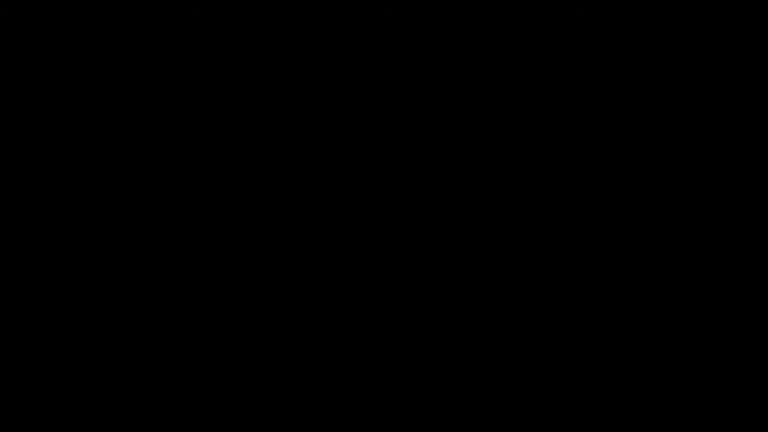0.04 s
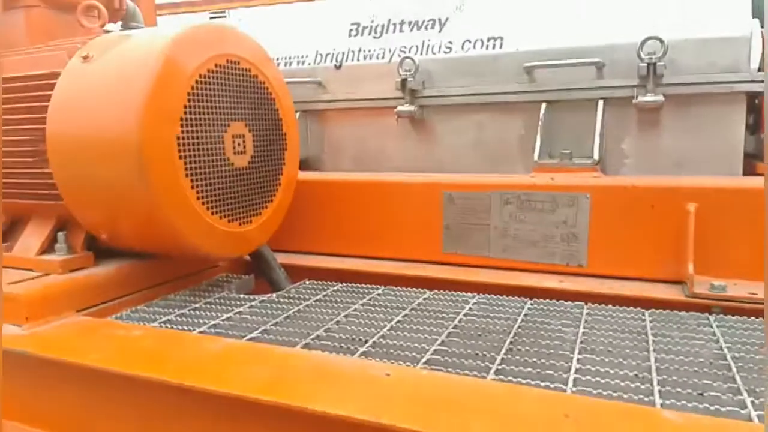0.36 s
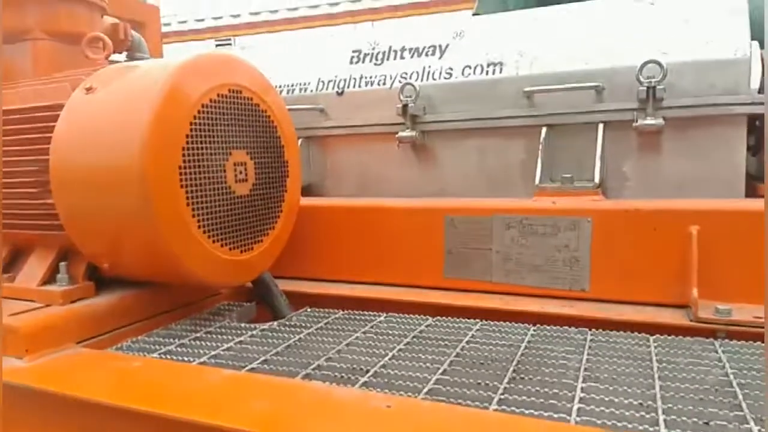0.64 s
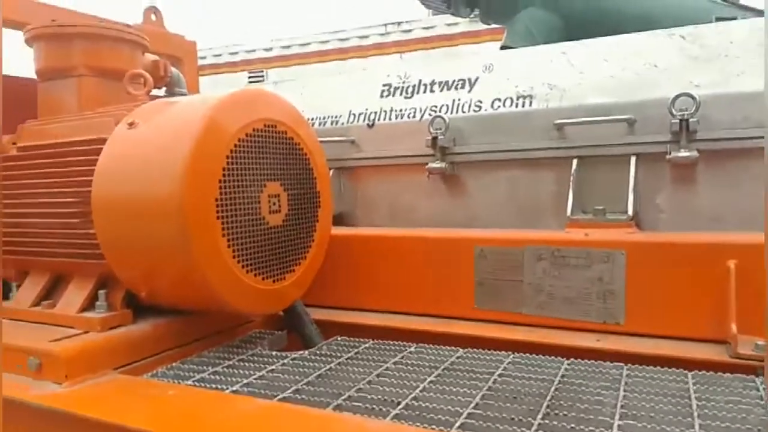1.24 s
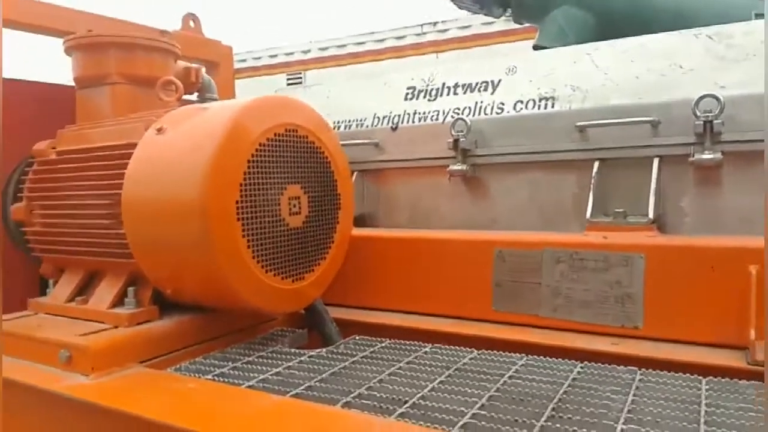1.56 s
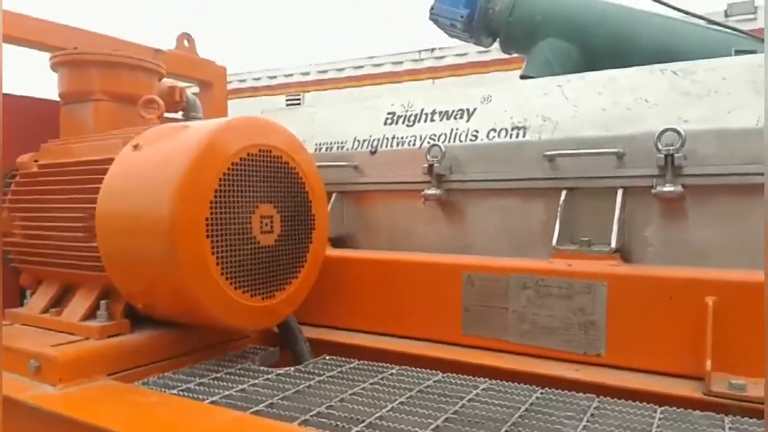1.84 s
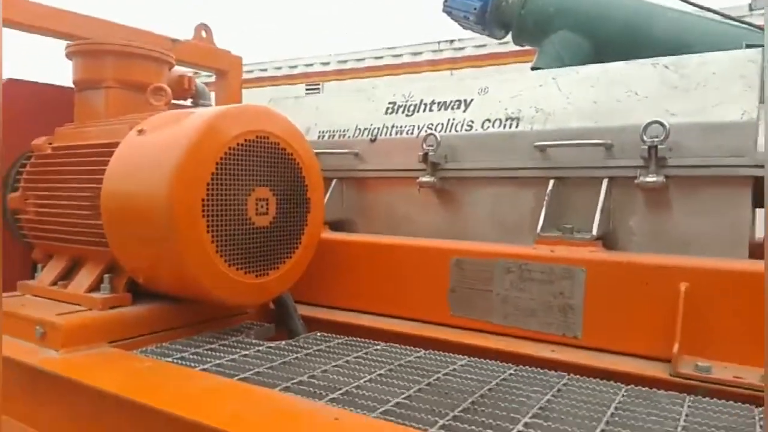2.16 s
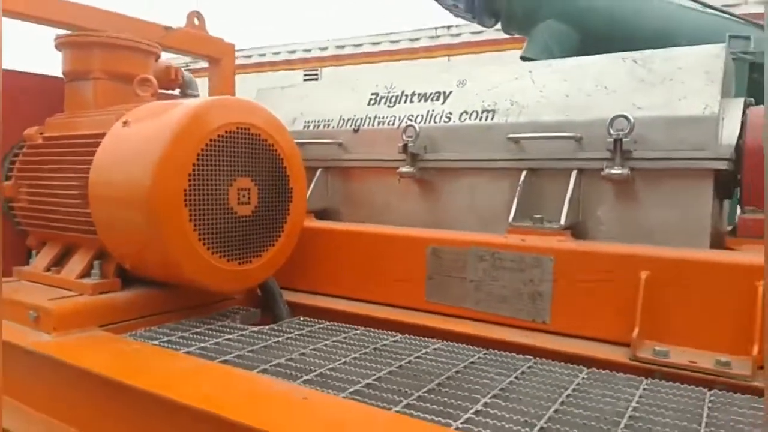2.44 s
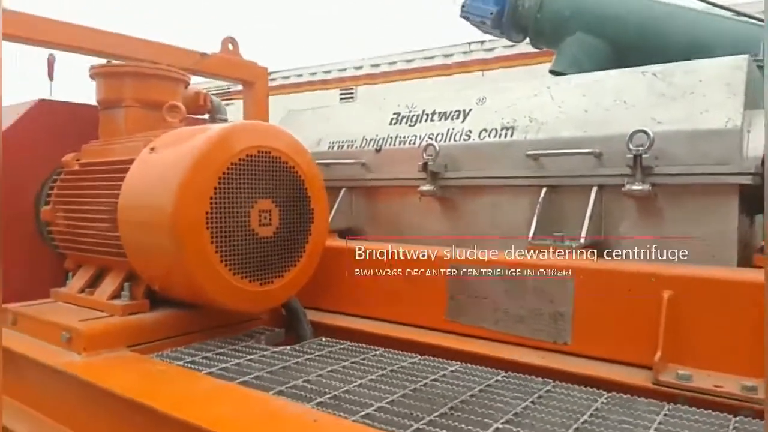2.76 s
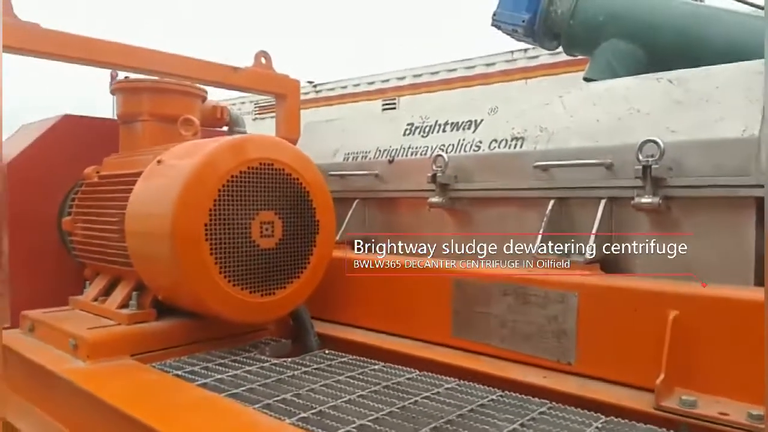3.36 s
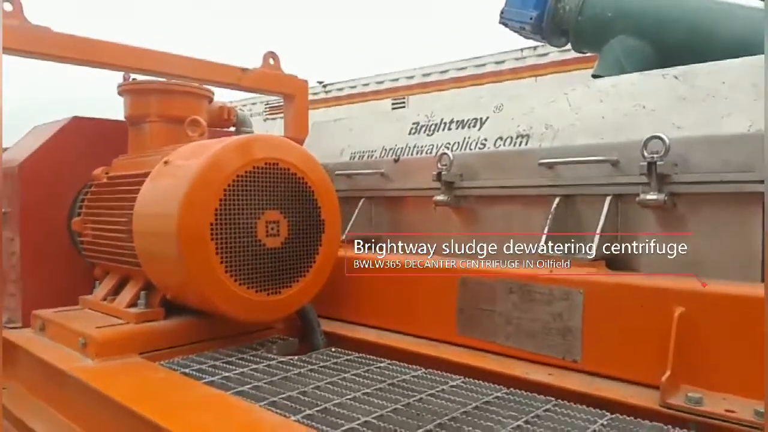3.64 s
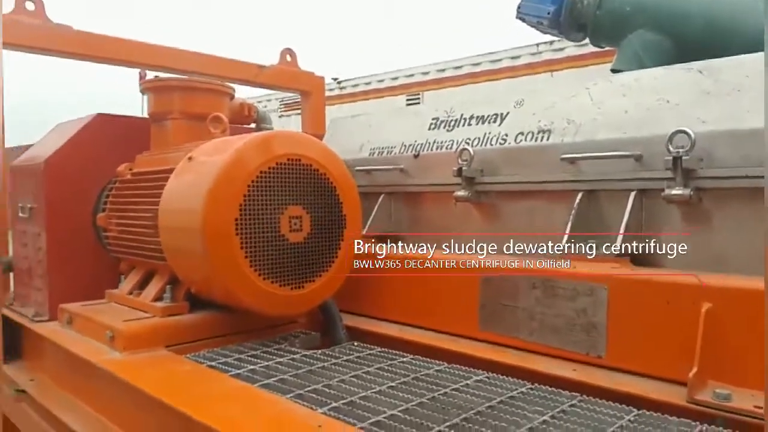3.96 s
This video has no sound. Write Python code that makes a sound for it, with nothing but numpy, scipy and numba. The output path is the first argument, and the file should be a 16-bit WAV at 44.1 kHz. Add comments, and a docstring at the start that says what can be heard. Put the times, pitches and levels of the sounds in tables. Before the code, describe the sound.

A large centrifuge is heard close up, already at full speed from about 0.1 seconds. Its low hum and the electric motor's steady tones sit within a constant roar and hiss, while a higher whine wavers in loudness. At about 1.3 seconds a low thump hits the microphone, briefly dipping the noise, with a much fainter one at 1.4. The machine runs on until the end, around 4 seconds.

```python
"""A decanter centrifuge runs at full speed, heard a step away: its unbalanced bowl makes the frame hum.
The drive's whine, modulated by each turn, carries sidebands spaced at the bowl rate.
Behind them the electric motor adds steady tones, and turbulent air and sludge roar and hiss.
Two low thumps of pressure strike the hand-held microphone; the first briefly pushes its limiter down."""
import sys
import numpy as np
from scipy import signal
from scipy.fft import rfft, irfft
from scipy.io import wavfile
from scipy.ndimage import uniform_filter1d
from numba import njit

SR = 44100
rng = np.random.default_rng(int(sys.argv[2]) if len(sys.argv) > 2 else 0)


def generate_wav(signal):
    """Clip the signal to [-1, 1] and save it as 16-bit WAV at the path in sys.argv[1]."""
    frames = np.transpose(np.atleast_2d(signal))
    scaled = np.clip(frames, -1, 1) * 32767
    pcm = np.round(scaled).astype(np.int16)
    wavfile.write(sys.argv[1], SR, pcm)


N = 176400

BOWL_HZ, WHINE_HZ, TOP_HZ = 47.22, 1011.0, 7500


def undb(db):
    return 10 ** (np.asarray(db) / 20)


def times():
    return np.arange(N) / SR


def curve(rows, column=1):
    """Linear interpolation of one table column over time."""
    rows = np.array(rows, float)
    return np.interp(times(), rows[:, 0], rows[:, column])


def walk(rate_hz):
    """Low-pass noise of unit variance: random steps, smoothed twice."""
    hold = int(SR / rate_hz)
    steps = np.repeat(rng.standard_normal(N // hold + 2), hold)[rng.integers(hold):]
    smooth = uniform_filter1d(uniform_filter1d(steps, hold), hold)[:N]
    return (smooth - smooth.mean()) / smooth.std()


def tone(cycles, rms_db, waver, rate_hz):
    """Interference with reflections, taken as a random phasor, varies a partial's amplitude and phase."""
    path = (1 + waver * (walk(rate_hz) + 1j * walk(rate_hz))) / np.sqrt(1 + 2 * waver ** 2)
    phasor = np.exp(2j * np.pi * (cycles + rng.random()))
    return np.sqrt(2) * undb(rms_db) * np.real(path * phasor)


def microphone_thumps():
    """Pressure transients from a puff of air or the hand: each a slow push with a shallow rebound."""
    # pushes on the microphone: start_s, level_db
    pushes = [(1.259, 7), (1.391, -8)]
    rise_s, decay_s, rebound_s = .018, .02, .065
    out = 0
    for start_s, level_db in pushes:
        age = np.maximum(times() - start_s, 0)
        push = (1 - np.exp(-age / rise_s)) * np.exp(-age / decay_s)
        rebound = age ** 2 * np.exp(-2 * age / rebound_s)
        out = out + undb(level_db) * (push / push.max() - .12 * rebound / rebound.max())
    return out


def turbulent_roar(turns):
    """Turbulence in air and sludge radiates broadband noise, coloured by resonances of the housing."""
    # spectral envelope of the turbulence: frequency_hz, relative_density_db
    envelope = [(20, -10), (60, -5), (110, -4), (160, -4.5), (200, -0.5), (270, -2), (360, -6.5),
                (520, -6.5), (620, -9), (790, -7.5), (950, -10), (1180, -12), (1370, -15.5), (1750, -17),
                (2400, -23), (3000, -23.5), (4000, -23), (5900, -23.5), (7200, -27.5), (7600, -39.5)]
    # peaks and a dip in the steel housing's response: centre_hz, width_hz, gain_db
    housing = [(3410, 79, 2), (3500, 160, 3), (3940, 60, -1), (5230, 260, 4), (5450, 60, 3)]
    # gains of the low roar, middle roar and hiss: time_s, low_db, middle_db, hiss_db
    range_gains = [(.15, -3.5, -0.5, 0.5), (.45, 1, 0.5, 0.5), (.8, -1, -1, -1), (1.22, -2, -0.5, -0.9),
                   (1.42, -1.5, -1.5, -1.5), (1.55, 1.5, 0.5, .8), (1.8, 2, 1, 0), (2.1, -.5, 0, .5),
                   (2.38, 0, 1.1, 1.8), (2.55, 0, -0.2, 0.2), (3.1, -0.5, .5, -0.1), (3.55, .5, .5, 0.5),
                   (4.0, -2, 1, 1)]
    low_below_hz, hiss_above_hz = 400, 2200
    base_db, swell_db, flicker_db = -17.5, .33, .71
    hz = np.maximum(np.arange(N // 2 + 1) * SR / N, 1)
    envelope_hz, density_db = np.array(envelope, float).T
    housing_db = sum(db / (1 + (2 * (hz - centre) / width) ** 2) for centre, width, db in housing)
    gain = undb(np.interp(np.log(hz), np.log(envelope_hz), density_db) + housing_db)
    gain *= (hz > 16) & (hz < TOP_HZ + 500)
    spectrum = rfft(rng.standard_normal(N)) * gain / np.sqrt(np.mean(gain ** 2))
    third_octave = np.floor(3 * np.log2(hz))
    out = 0
    for band in np.unique(third_octave[gain > 0]):  # each band flickers alone; all swell together
        inside = third_octave == band
        centre_hz = hz[inside].mean()
        column = 1 + int(centre_hz > low_below_hz) + int(centre_hz > hiss_above_hz)
        band_db = curve(range_gains, column) + flicker_db * walk(22.12)
        out = out + irfft(spectrum * inside, N) * undb(band_db)
    turn_pulse = 1 + .041 * np.cos(2 * np.pi * turns)
    return out * undb(base_db + swell_db * walk(24)) * turn_pulse


def motor_tones():
    """Superposition: tones of motor, belt and mains beat against nearby harmonics of the bowl."""
    # steady partials: pitch_hz, level_db
    partials = [(24.8, -32), (118.8, -22.5), (181.3, -30), (270, -35.5), (296, -36.5), (300, -32),
                (784, -41)]
    return sum(tone(hz * times(), db, waver=.26, rate_hz=3.04) for hz, db in partials)


def drive_whine(turns):
    """Modulation by each turn of the bowl splits the drive's whine into a carrier and sidebands."""
    # strong partials, whose levels shift as the microphone moves: time_s, level_db
    carrier_levels = [(.15, -34), (.55, -32.5), (.95, -26), (1.22, -22), (1.55, -33.5), (2.1, -25.5),
                      (2.3, -46), (2.55, -30), (3.4, -26.5), (4.0, -36)]
    upper_levels = [(.25, -25.5), (.5, -29), (.76, -25.5), (1.0, -44), (1.55, -36), (2.3, -38.5),
                    (2.48, -24.5), (2.7, -41.5), (2.88, -23.5), (3.3, -27.5), (3.6, -39.5), (4.0, -34)]
    lower_levels = [(.15, -45), (1.7, -43), (2.05, -32), (2.45, -31), (2.8, -32.5), (3.15, -27.5),
                    (3.6, -24), (4.0, -29)]
    # weak sidebands: offset_in_bowl_rates, relative_level_db
    sidebands = [(-4, -41), (-1, -35), (2, -36), (3, -44), (4, -38), (5, -41), (6, -46), (8, -46), (9, -48),
                 (10, -48), (11, -46), (12, -49), (14, -47)]
    carrier = turns * WHINE_HZ / BOWL_HZ
    lower_db = curve(lower_levels)
    partials = [(-3, lower_db - 1), (-2, lower_db), (0, curve(carrier_levels)), (1, curve(upper_levels))]
    strong = sum(tone(carrier + k * turns, db, waver=.19, rate_hz=7) for k, db in partials)
    weak = sum(tone(carrier + k * turns, db + .5, waver=.44, rate_hz=4.97) for k, db in sidebands)
    return strong + weak


def bowl_hum(turns):
    """Forced vibration: unbalance shakes the frame at harmonics of the bowl rate, chiefly the second."""
    # strong harmonics, at one, two and four times the bowl rate: time_s, level_db
    fundamental = [(.15, -32), (.45, -24), (.85, -21.5), (1.5, -28), (1.7, -36), (2.2, -29), (2.85, -24.5),
                   (3.5, -32), (4.0, -35)]
    second = [(.15, -20.5), (.47, -28), (.65, -21), (1.0, -17), (1.45, -22), (1.7, -18), (2.05, -17.5),
              (2.38, -35.5), (2.6, -20.5), (2.85, -18), (4.0, -18)]
    fourth = [(.15, -26.5), (.65, -23), (1.5, -22), (1.72, -38), (2.05, -41), (2.25, -24), (2.7, -26),
              (3.15, -36), (3.5, -16.5), (4.0, -38.5)]
    # weak harmonics: harmonic_number, relative_level_db
    overtones = [(3, -30), (5, -29), (6, -32), (7, -31), (8, -38), (9, -36), (11, -40), (14, -43),
                 (15, -42)]
    partials = [(1, fundamental), (2, second), (4, fourth)]
    strong = sum(tone(k * turns, curve(levels), waver=.04, rate_hz=3.4) for k, levels in partials)
    weak = sum(tone(k * turns, db + .5, waver=.3, rate_hz=3.46) for k, db in overtones)
    return strong + weak


def scene():
    """The pressures add; one slightly drifting rotation ties together hum, whine and the roar's pulse."""
    speed_hz = BOWL_HZ * (1 + .001196 * walk(1.962))
    turns = np.cumsum(speed_hz) / SR
    machine = bowl_hum(turns) + motor_tones() + drive_whine(turns) + turbulent_roar(turns)
    return (machine + microphone_thumps())[None]


@njit
def peak_follower(x, decay):
    """Envelope detection with instant attack and exponential release."""
    out, peak = np.empty(len(x)), 0.
    for i in range(len(x)):
        peak = max(abs(x[i]), peak * decay)
        out[i] = peak
    return out


def record(dry):
    """Peak limiting, then band limiting of the microphone's signal, which opens after a brief silence."""
    ceiling, release_s, low_cut_hz, start_s = .7, .042, 4, .112
    peak = peak_follower(dry[0], np.exp(-1 / (release_s * SR)))
    limited = dry * uniform_filter1d(ceiling / np.maximum(peak, ceiling), size=44)
    high_pass = signal.butter(1, low_cut_hz, "high", fs=SR, output="sos")
    low_pass = signal.ellip(8, .2, 70, TOP_HZ, fs=SR, output="sos")
    gated = signal.sosfilt(high_pass, limited) * (times() > start_s)
    return signal.sosfilt(low_pass, gated)


dry = scene()
out = record(dry)
generate_wav(out)
```